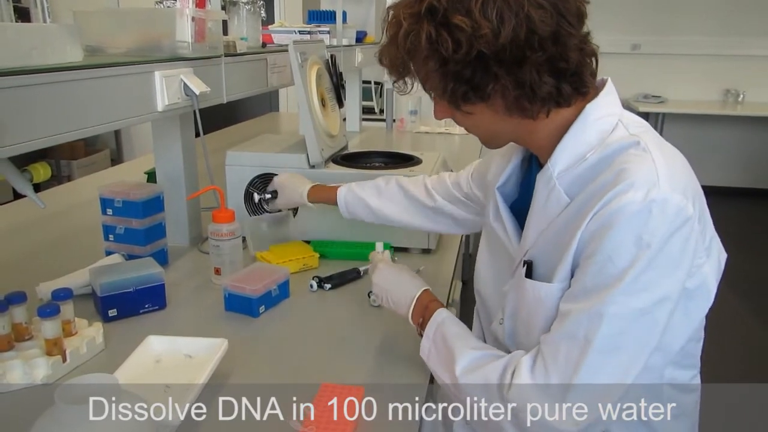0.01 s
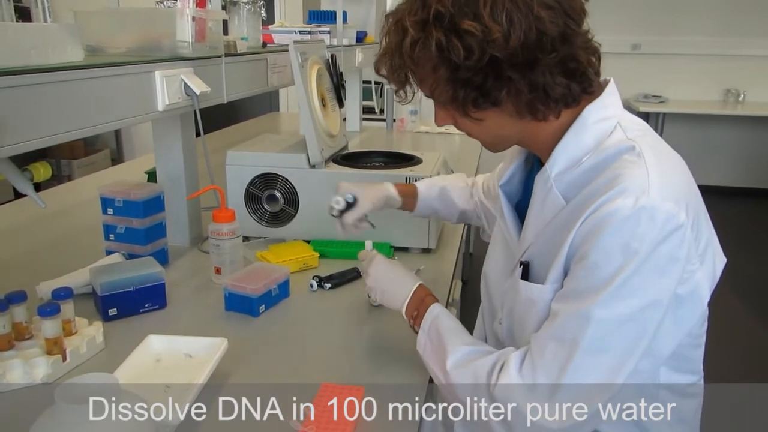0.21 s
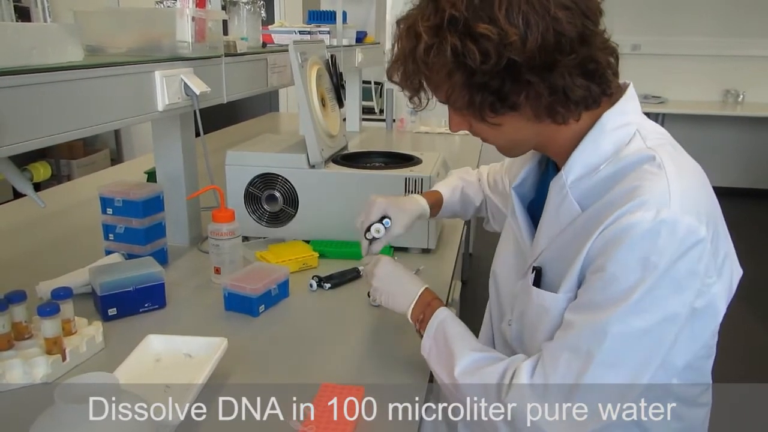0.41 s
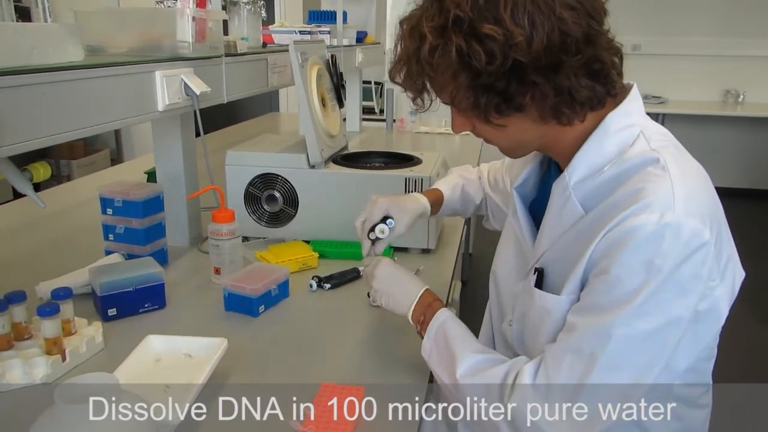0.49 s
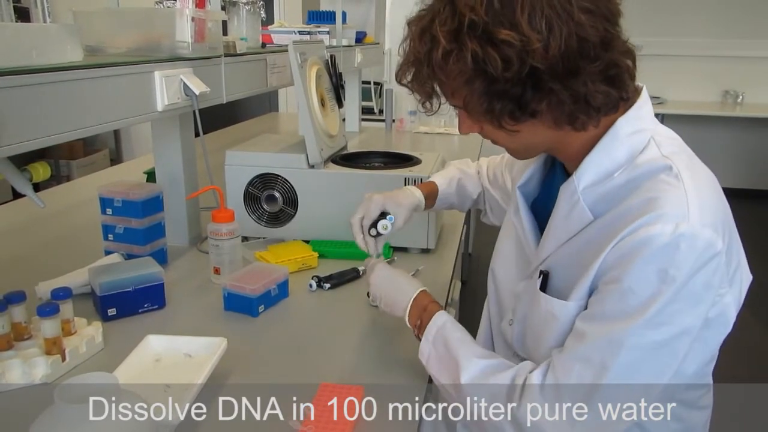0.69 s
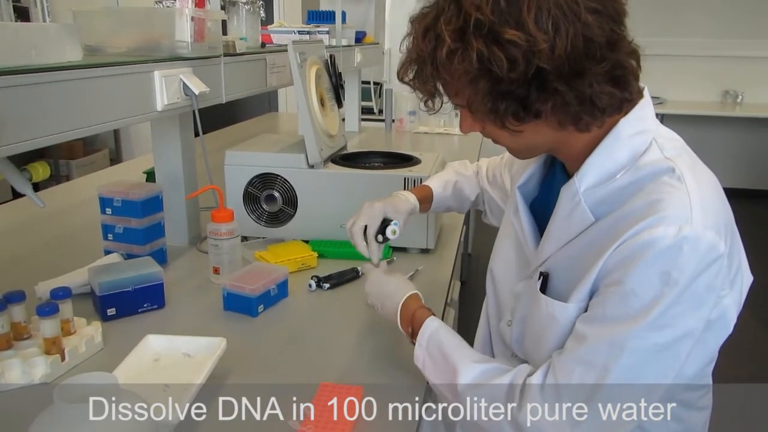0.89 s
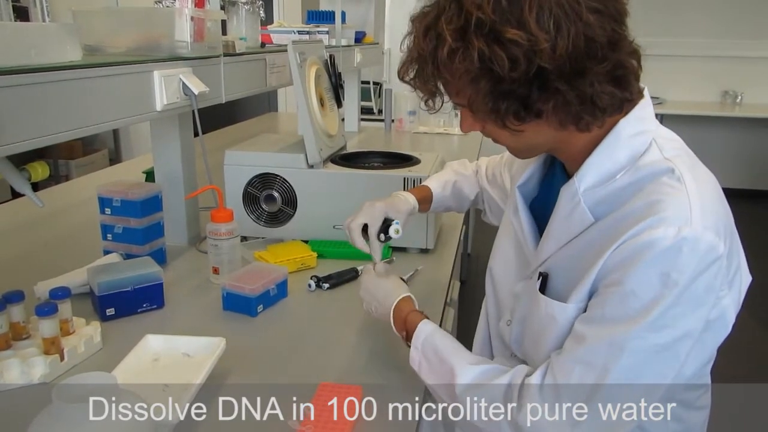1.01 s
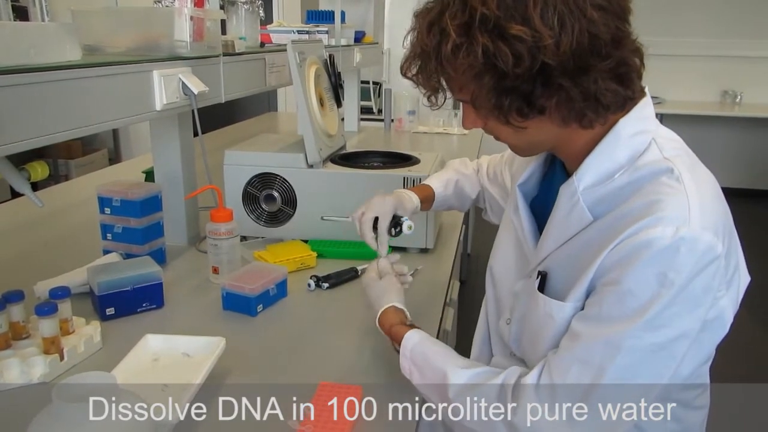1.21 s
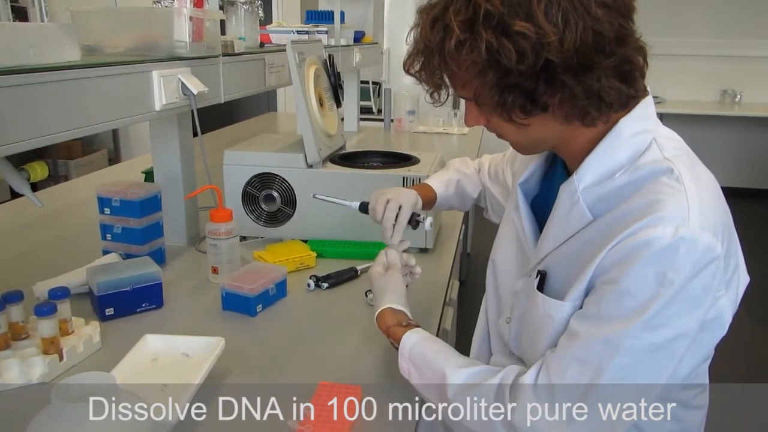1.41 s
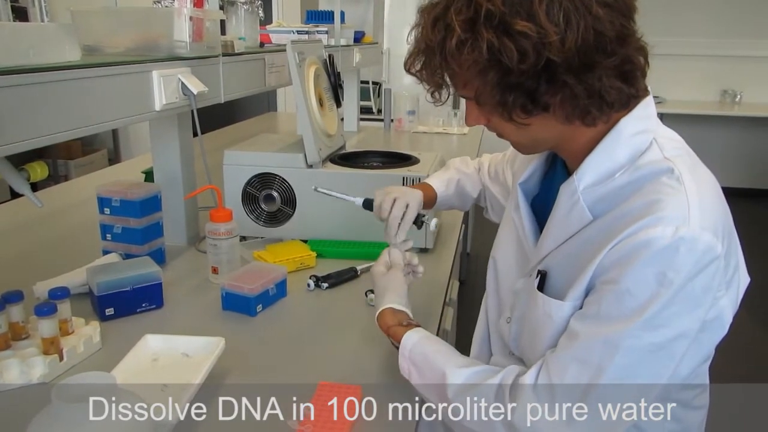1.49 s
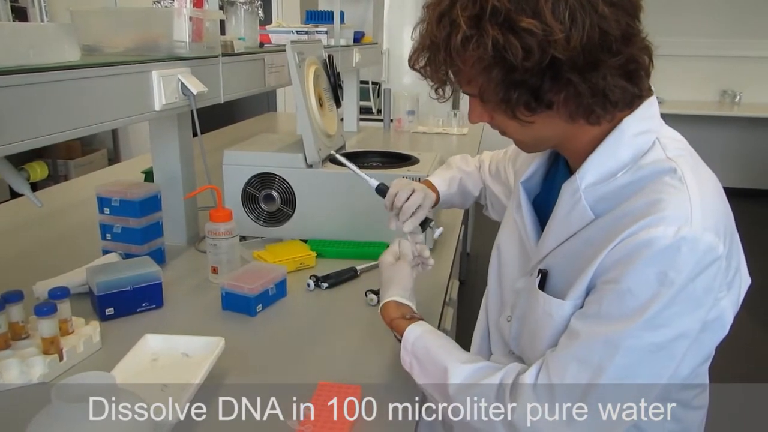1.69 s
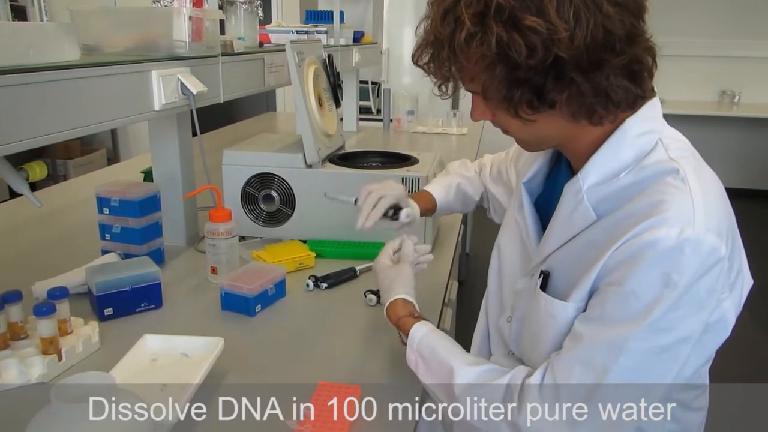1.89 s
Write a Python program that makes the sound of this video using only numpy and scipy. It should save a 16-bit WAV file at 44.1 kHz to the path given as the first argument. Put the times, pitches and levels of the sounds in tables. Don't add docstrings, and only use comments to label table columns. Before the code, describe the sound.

Near the start, a hard plastic tool knocks and bounces once with a short bright room echo; sparse light ticks from handling follow, very quiet, over steady low hum and soft hiss, close microphone in a reflective laboratory.

```python
import sys
import numpy as np
from scipy import signal
from scipy.fft import rfft, irfft
from scipy.io import wavfile
from scipy.ndimage import uniform_filter1d

SR = 44100
rng = np.random.default_rng(int(sys.argv[2]) if len(sys.argv) > 2 else 0)


def persist_wave(psi):
    counts = np.round(np.clip(psi, -1, 1) * 32767).astype(np.int16)
    wavfile.write(sys.argv[1], SR, np.atleast_2d(counts).T)


def to_linear_factor(level_db):
    exponent = np.asarray(level_db, float) / 20
    return 10 ** exponent


N = 88200

# freq_hz, density_db
RUMBLE_SPECTRUM = [(12, -16.5), (25, -5.5), (50, 4), (80, -11), (130, -1.5), (190, -4.5), (260, -23),
                   (420, -30.5), (800, -71)]
# freq_hz, density_db
HISS_SPECTRUM = [(400, -9.5), (560, -9.5), (971, -8), (2760, -20.5), (5000, -25), (11800, -27.5),
                 (12400, -38.5), (13400, -33), (16000, -44.5)]
# freq_hz, density_db
DUCT_SPECTRUM = [(120, -30.5), (200, -3), (260, 0), (320, -9), (400, -21.5), (700, -57.5)]
# time_s, level_db
DUCT_FLOW = [(0, -54.5), (.7, -54.5), (1.0, -58.5), (1.4, -52.5), (1.5, -67), (2, -71)]
# freq_hz, t60_s
ROOM_T60 = [(300, 0.53), (1000, 0.57), (3000, 0.69), (8000, 0.64), (16000, 0.75)]
# freq_hz, level_db
ROOM_TONE = [(150, 0.5), (350, 4.5), (1100, 9), (2600, 2.5), (3300, -5.5), (5500, -5.5), (11000, -6.5),
             (16000, -28)]
# delay_s, level_db
ECHOES = [(.0031, -1.5), (.0058, -7), (.0081, -3.5), (0.01, -4.5), (0.012, -2.5), (.0195, -3)]
# start_s, level_db
SCATTERED_BLOWS = [
    (0.2013, 13.5),
    (0.291, -2.5),
    (0.517, -54),
]
# start_s, level_db, pitch_hz, t60_s
HANDLING_TICKS = [(0.561, -59.5, 2510, 0.23), (0.591, -64, 4500, 0.12), (.6, -65, 6080, 0.33),
                  (.62, -71, 10900, 0.29), (0.729, -77, 6900, 0.2), (.74, -77, 9800, 0.3),
                  (0.6407, -53, 2448, 0.12), (0.639, -58.5, 4600, 0.055), (0.6728, -58, 5780, 0.15),
                  (.674, -74, 2313, 0.13), (.675, -56, 10300, 0.052), (.676, -65, 13000, 0.079),
                  (0.695, -59.5, 5740, 0.0518), (.7116, -60.5, 5487, 0.044), (0.714, -57.5, 1858, 0.088),
                  (0.761, -62, 1833, 0.19), (.81, -76, 9680, 0.077), (.945, -66, 5136, 0.067),
                  (.946, -59.5, 2840, 0.021), (1.58, -70, 3730, 0.029), (1.736, -68.5, 11500, 0.013),
                  (1.759, -75, 10400, 0.037), (1.765, -57.5, 2465, 0.041),
                  (0.676, -64, 10630, .08), (0.782, -75, 11180, 0.061), (1.075, -69, 9800, 0.071),
                 (1.0929, -64.5, 4138, .12), (1.19, -70, 9500, 0.086), (1.202, -62.5, 10480, 0.12),
                 (1.4257, -68.5, 10570, 0.032), (1.445, -75, 9000, 0.0279), (1.5247, -66.5, 3750, 0.032),
                 (1.571, -68.5, 6548, 0.044), (1.599, -67.5, 9280, 0.038), (1.599, -68.5, 8000, 0.07),
                 (1.7363, -60.5, 3400, 0.024), (1.755, -73, 3060, 0.041), (1.7647, -59.5, 2886, 0.13),
                 (1.794, -59, 2804, 0.033), (1.816, -76, 9200, .02), (1.757, -63, 6000, .02),
                 (1.796, -70, 5600, 0.025), (1.845, -56, 3013, 0.11), (1.845, -57, 2380, 0.022),
                 (.72, -53, 788, 0.18), (.755, -56.5, 758, 0.22)]
# freq_hz, level_db, t60_s
PLUNGER_MODES = [(2600, -4, .015), (4230, 4, 0.015), (4910, 5, .015), (6450, 9, 0.0117), (6900, -3, 0.011),
                 (8400, -8, .008), (10700, -3.5, .012), (11500, -5, .008), (13800, -7, .01)]
# start_s, level_db, favoured_hz
PLUNGER_HITS = [(.5155, -50, 7486), (.5178, -43, 6390), (.5188, -45, 4900), (.519, -38, 11200),
                (0.519, -48, 3000), (.56, -40, 13500)]
# freq_hz, level_db, t60_s
SPRING_MODES = [(5717, 1, 0.35), (6200, 2, 0.084), (7700, 1, 0.18), (8250, 0.5, 0.072), (9570, 0, 0.16),
                (10200, -1, 0.09), (10740, -9, 0.1), (13000, -5, 0.21), (13980, -9, .1), (14650, 8, 0.04),
                (14750, -15, .3)]
# start_s, level_db, favoured_hz
SPRING_HITS = [(1.827, -51, 14300), (1.8275, -55.5, 7500), (1.828, -62, 6240), (1.8325, -49.5, 5700),
               (1.833, -55.5, 8300), (1.832, -57, 10000), (1.8471, -56.5, 6240), (1.846, -63, 13200),
               (1.8534, -59.5, 10200)]
# freq_hz, level_db, t60_s
COLLAR_MODES = [(2410, 5, 0.05), (4560, 3, 0.084), (5518, -4.5, 0.15), (5670, 3, .07), (6080, 1.5, 0.05),
                (7800, -4.5, 0.07), (8100, -6, 0.087), (9430, -4, 0.082), (10900, -23, 0.045),
                (14580, 2, 0.045)]
# start_s, level_db, favoured_hz
COLLAR_HITS = [(1.618, -64, 14600), (1.6185, -62.5, 6000), (1.621, -50, 2490), (1.6215, -59, 9000),
               (1.6225, -54.5, 4600), (1.627, -62, 5500), (1.63, -65, 2500), (1.642, -66, 2520)]
# freq_hz, level_db, t60_s
EJECTOR_MODES = [(1838, 0.5, 0.086), (2260, -8, 0.066), (5136, 12.5, 0.04), (5260, -10, 0.48),
                 (6500, 3, .03), (8050, -3, 0.04), (8608, 3.5, 0.048), (8630, -13, .5), (9100, -4, 0.17),
                 (9970, 4.5, 0.04), (10400, -3, .03)]
# start_s, level_db, favoured_hz
EJECTOR_HITS = [(0.8615, -64, 8110), (.866, -67, 10100), (.867, -64.5, 4920), (.868, -55.5, 1890),
                (.8745, -59.5, 8800), (.892, -70, 4560)]
# freq_hz, level_db, t60_s
CONE_MODES = [(2770, 8, 0.0733), (4780, 3, 0.039), (5770, -1, 0.16), (7750, 1, 0.096), (9000, -15, .04),
              (14650, -9, 0.063)]
# start_s, level_db, favoured_hz
CONE_HITS = [(1.9814, -58, 9000), (1.984, -57.5, 7694), (1.984, -62.5, 2700), (1.984, -58, 4700),
             (1.987, -57, 5750)]
# freq_hz, level_db, t60_s
RACK_MODES = [(2354, -1, 1.2), (2620, -3, 1), (4520, -5, 0.85), (5824, -5.5, 1.1), (7113, -20, 1.5),
              (9750, -17, 1.6), (10770, -9.5, 1.2)]
# start_s, level_db
RACK_HITS = [
    (.203, -46),
    (.292, -50.5),
]
# freq_hz, level_db, t60_s
BENCH_MODES = [(198, -6.5, 0.13), (243, -3.5, 0.33), (393.4, -8, 0.48), (547, -8, 0.3), (638, 0, .35),
               (795, -2.5, 0.41), (910, -0.5, 0.24), (1265, -0.5, 0.49), (1500, -3.5, 0.2),
               (1910, -2, 0.55)]
# start_s, level_db
BENCH_HITS = [
    (.203, -35),
    (.292, -32),
]
# freq_hz, level_db, t60_s
SHELL_MODES = [(3400, -14.5, 0.0023), (4540, -2.5, 0.0087), (5000, -5.5, .005), (6000, 0.5, 0.0058),
               (7300, -10, 0.0043), (8110, -5, .007), (10100, -5, 0.007), (10930, -5.5, 0.0078),
               (11600, -13, .006), (12700, -8, 0.006), (14100, -13.5, 0.006)]
# freq_hz, level_db, t60_s
BODY_MODES = [(888, -10.5, 0.044), (1123, 2, .022), (1449, -3, 0.015), (1740, -1.5, 0.013),
              (1930, -2.5, 0.02), (2514, 2.5, 0.02), (2750, -5.5, .012)]
# freq_hz, level_db, t60_s
BODY_SIDE_MODES = [(897, -8, .06), (1404, 0, 0.023), (1690, -3, 0.031), (1962, 1.5, 0.029),
                   (2530, -1.5, 0.023), (3530, 0.5, 0.0072)]
# start_s, body_db, shell_db, contact_s
KNOCK_CONTACTS = [
    (0.1988, -41.5, -52.5, .002),
    (0.2004, -32.5, -45, .001),
    (0.2017, -12.5, -39, .0005),
    (0.2023, -23, -11, .0002),
    (.2031, -30.5, -13.5, .0002),
    (0.2046, -14.5, -22, 0.0004),
    (0.2067, -27.5, -34.5, 0.001),
]
# start_s, body_db, shell_db, contact_s
BOUNCE_CONTACTS = [
    (0.2898, -43, -23.5, 0.0003),
    (.2909, -32, -18.5, .0002),
    (0.2921, -17.5, -28, 0.0004),
    (0.299, -47, -42, .001),
    (.319, -26.5, -39.5, 0.0021),
]

STRIKE_SPREAD_DB = 1.5
RATTLE, RATTLE_HZ = 0.8, 220
SWELL_DB = 0.7


def evened(x):
    return x / np.sqrt(np.mean(x ** 2) + 1e-20)


def read(points, hz):
    f, value = np.transpose(points)
    return np.interp(np.log(hz + 1), np.log(f + 1), value)


def add(mix, start_s, sound):
    part = mix[round(start_s * SR):][:len(sound)]
    part += sound[:len(part)]


def air(spectrum, level_db, patchy_db, swell_db):
    frames, hz = N // 256 + 5, np.fft.rfftfreq(1024, 1 / SR)
    real, imag, patches = rng.standard_normal((frames, 513, 3)).T
    patches = uniform_filter1d(patches, size=10, axis=0)
    patches = evened(uniform_filter1d(patches, size=12, axis=1))
    swell = evened(uniform_filter1d(rng.standard_normal(frames), size=30))
    gain_db = read(spectrum, hz)[:, None] + patchy_db * patches + swell_db * swell
    noise = signal.istft((real + 1j * imag) * to_linear_factor(gain_db), nperseg=1024, noverlap=768)[1][:N]
    return to_linear_factor(level_db) * evened(noise)


def ventilation():
    flow_db = np.interp(np.arange(N) / SR, *np.transpose(DUCT_FLOW))
    duct = air(DUCT_SPECTRUM, 0, 2, SWELL_DB) * to_linear_factor(flow_db)
    rumble = air(RUMBLE_SPECTRUM, -46.5, 0.81, SWELL_DB)
    hiss = air(HISS_SPECTRUM, -65, 0.84, 0.73)
    return duct + rumble + hiss


def room(x, echoes):
    taps = np.zeros(SR)
    slots = np.arange(200, SR - 20, 20)
    taps[slots + rng.integers(0, 20, len(slots))] = rng.choice([-1., 1.], len(slots))
    hz, t, z = signal.stft(taps, SR, nperseg=512)
    decay_db = read(ROOM_TONE, hz)[:, None] - 60 * t / read(ROOM_T60, hz)[:, None]
    tail = signal.istft(z * to_linear_factor(decay_db), SR, nperseg=512)[1]
    tail = tail / np.linalg.norm(taps * to_linear_factor(-100 * np.arange(SR) / SR))
    for delay_s, level_db in echoes:
        add(tail, delay_s, to_linear_factor([level_db]))
    return signal.fftconvolve(x, tail)[:N]


def ring(modes, rough=0.):
    t = np.arange(0, min(max(t60 for _, _, t60 in modes), 1), 1 / SR)
    shake_s = np.arange(400) / RATTLE_HZ
    out = np.zeros(len(t))
    for k, (hz, level_db, t60) in enumerate(modes):
        level_db = level_db + STRIKE_SPREAD_DB * rng.standard_normal()
        in_phase, quadrature = (np.interp(t, shake_s, rng.standard_normal(400)) for _ in range(2))
        onset = np.minimum(t * hz / (rough * 6 + 1e-3), 1)
        wave = (1 - rough / 2 + rough * in_phase) * np.sin(2 * np.pi * hz * t)
        wave += rough * quadrature * np.cos(2 * np.pi * hz * t)
        out += (-1) ** k * to_linear_factor(level_db - 60 * t / t60) * onset * wave
    return out


def snap(hz):
    t = np.arange(2000) / SR
    band_hz = [hz * 0.63, min(hz * 2.5, 15000)]
    band = signal.butter(2, band_hz, "band", fs=SR, output="sos")
    return to_linear_factor(-60 * t / 0.02) * signal.sosfilt(band, rng.standard_normal(2000))


def ticks():
    out = np.zeros(N)
    for start_s, level_db, hz, t60 in HANDLING_TICKS:
        cluster = [(hz, 0, t60), (hz * 1.03, -4, t60), (hz * 0.96, -5, t60)]
        add(out, start_s, to_linear_factor(level_db + 2) * snap(hz))
        add(out, start_s, to_linear_factor(level_db) * ring(cluster, RATTLE))
    return out


def loose_parts():
    out = np.zeros(N)
    parts = [(PLUNGER_MODES, PLUNGER_HITS), (SPRING_MODES, SPRING_HITS), (COLLAR_MODES, COLLAR_HITS),
             (EJECTOR_MODES, EJECTOR_HITS), (CONE_MODES, CONE_HITS)]
    for modes, hits in parts:
        for start_s, level_db, near_hz in hits:
            woken = [(hz, mode_db - 26 * abs(np.log2(hz / near_hz)), t60)
                     for hz, mode_db, t60 in modes]
            add(out, start_s, to_linear_factor(level_db - 2) * snap(near_hz))
            add(out, start_s, to_linear_factor(level_db) * ring(woken, RATTLE / 2))
    return out


def bench_and_rack():
    out = np.zeros(N)
    for start_s, level_db in BENCH_HITS:
        hum = ring(BENCH_MODES, RATTLE / 2)
        rise = np.minimum(np.arange(len(hum)) / SR / 0.025, 1)
        add(out, start_s, to_linear_factor(level_db) * hum * rise)
    for start_s, level_db in RACK_HITS:
        add(out, start_s, to_linear_factor(level_db) * ring(RACK_MODES, 2 * RATTLE))
    return out


def contact_chatter(contact_s):
    t = np.arange(1000) / SR
    burst = rng.standard_normal(1000) * np.exp(-t / contact_s)
    white = irfft(np.exp(1j * np.angle(rfft(burst))))
    chatter = white * np.exp(-t / (2 * contact_s))
    return chatter / np.linalg.norm(chatter)


def pipette_landings():
    out = np.zeros(N)
    for body, contacts in ((BODY_MODES, KNOCK_CONTACTS), (BODY_SIDE_MODES, BOUNCE_CONTACTS)):
        for start_s, body_db, shell_db, contact_s in contacts:
            chatter = contact_chatter(contact_s)
            shell = signal.fftconvolve(ring(SHELL_MODES), chatter)
            crack = chatter[2:] - chatter[:-2]
            add(out, start_s, to_linear_factor(body_db + 1.5) * ring(body))
            add(out, start_s, to_linear_factor(shell_db + 5.5) * shell)
            add(out, start_s, to_linear_factor(shell_db + 4.5) * crack)
    return signal.sosfilt(signal.butter(3, 835, "high", fs=SR, output="sos"), out)


def scene():
    landings, small = pipette_landings(), loose_parts() + ticks()
    blows = np.zeros(N)
    for start_s, level_db in SCATTERED_BLOWS:
        add(blows, start_s, to_linear_factor([level_db]))
    wet = room(blows, []) + room(to_linear_factor(-14.5) * landings + to_linear_factor(-14) * small, ECHOES)
    return (landings + bench_and_rack() + small + wet + ventilation())[None]


def top_cut(x):
    return signal.sosfilt(signal.butter(12, 16830, fs=SR, output="sos"), x)


def record(dry):
    threshold_db, duck_share, duck_max_db, recover_db_per_s = -44, 0.5, 7, 45
    limit, edge_hz = 0.93, 15900
    power = abs(uniform_filter1d(dry[0] ** 2, size=800, origin=399))
    power_db = 10 * np.log10(power + 1e-12)
    fall_db = np.arange(N) * recover_db_per_s / SR
    held_db = np.maximum.accumulate(power_db + fall_db) - fall_db
    over_db = np.maximum(held_db - threshold_db, 0)
    duck_db = np.minimum(duck_share * over_db, duck_max_db)
    ducked = dry / to_linear_factor(uniform_filter1d(duck_db, size=600, origin=299))
    limited = ducked / (1 + (ducked / limit) ** 6) ** (1 / 6)
    lowpass = signal.firwin(41, edge_hz, window=("kaiser", 3), fs=SR)
    mix = signal.oaconvolve(limited, lowpass[None], "same")
    return top_cut(mix)


dry = scene()
out = record(dry)
persist_wave(out)
```